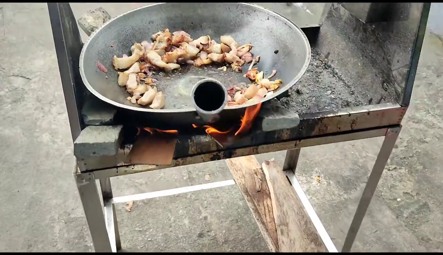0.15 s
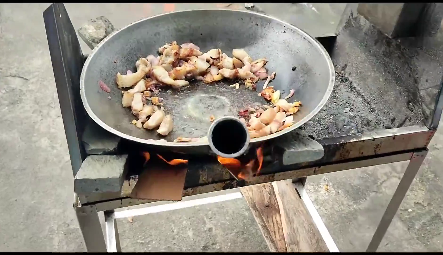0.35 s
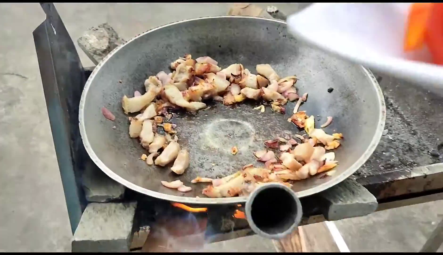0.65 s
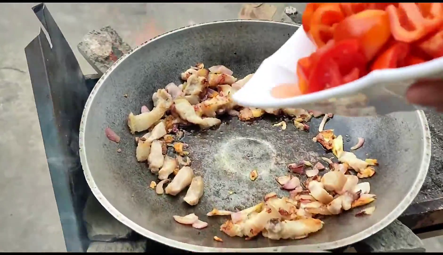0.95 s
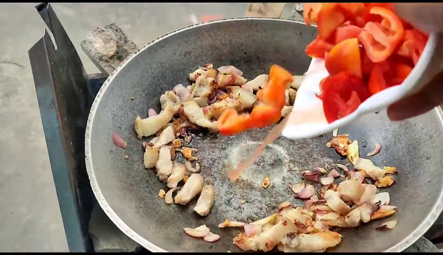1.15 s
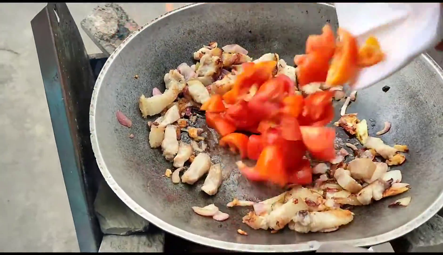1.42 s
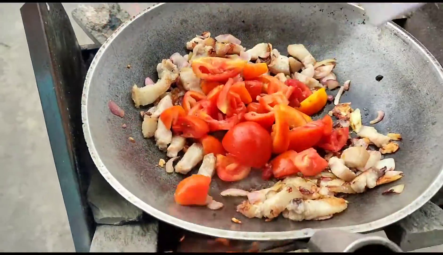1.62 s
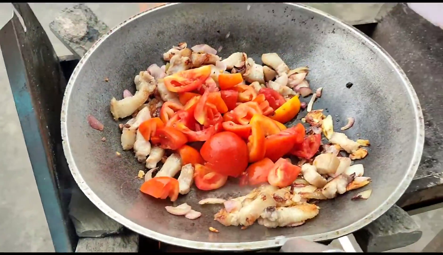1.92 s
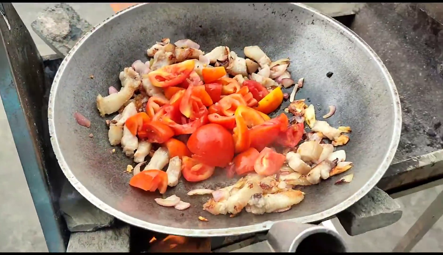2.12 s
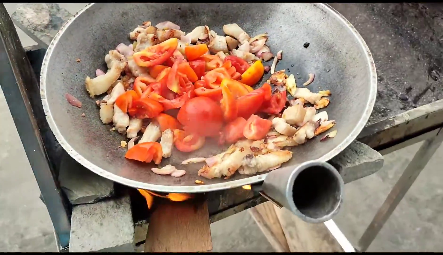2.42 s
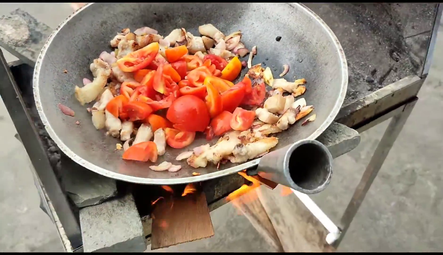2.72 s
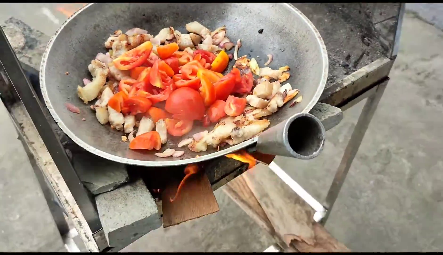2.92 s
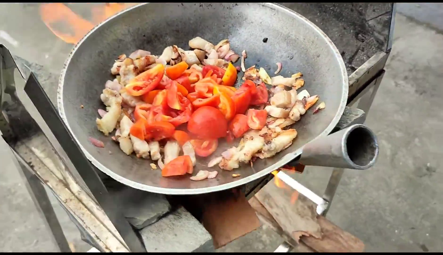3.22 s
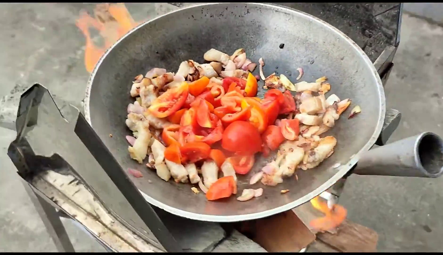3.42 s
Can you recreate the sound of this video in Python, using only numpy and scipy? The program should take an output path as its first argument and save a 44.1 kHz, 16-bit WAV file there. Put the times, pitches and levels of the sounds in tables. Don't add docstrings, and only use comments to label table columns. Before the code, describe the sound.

Meat sizzling in a metal wok, crackling and spitting, surging louder when wet tomatoes drop in

```python
import sys
import numpy as np
from scipy import signal
from scipy.fft import rfft, irfft, next_fast_len
from scipy.io import wavfile
from scipy.ndimage import uniform_filter1d, map_coordinates

SR = 44100
rng = np.random.default_rng(int(sys.argv[2]) if len(sys.argv) > 2 else 0)


def master(y):
    cut = np.clip(np.atleast_2d(y).T, -1, 1)
    pcm = np.round(cut * 32767)
    wavfile.write(sys.argv[1], SR, pcm.astype(np.int16))


def ratio_of_db(decibels):
    return 10 ** (np.asarray(decibels, float) / 20)


N = 156555

# time in seconds, level in dB.
BOIL_DB = [(0, -33), (.25, -29.5), (.47, -28), (.7, -30), (1.0, -31), (1.285, -32), (1.3, -23.5),
           (1.345, -16.5), (1.4, -16), (1.485, -14), (1.51, -12.5), (1.9, -12.5), (2.15, -11.5),
           (2.3, -12.5), (2.55, -13.5), (2.8, -16), (3.15, -13), (3.55, -16)]
# frequency in Hz, density in dB per Hz.
HISS_DB = [(500, -28.5), (609, -14.5), (784, -21.5), (1110, -16), (4880, -4.5), (7200, -2), (8400, -9.5),
           (14400, -12.5)]
# frequency in Hz, left-right difference in dB.
LEAN_DB = [(100, 1), (1400, 1), (3100, 0), (6800, -8.5), (7700, -15.5), (8500, 10.5), (9900, -4),
           (14000, 1)]
# frequency in Hz, correlation from 0 to 1.
HISS_ALIKE = [(100, 1), (1000, 0.95), (2500, 0.93), (5000, 0.011), (14000, 0.014)]
# centre in seconds, left gain in dB, right gain in dB.
LULLS_DB = [(1.545, -1, -3), (1.635, -4, -1.8), (1.686, -4.5, -4.5), (1.74, -0.2, -3.5), (1.785, -1, -7.5),
            (1.896, -5.5, -2.5), (2.0, 0.5, -2.5), (2.05, 0.5, 0.5), (2.09, 1.7, 0), (2.135, 0.5, 1),
            (2.2, -2, -2), (2.24, -3, -7), (2.325, -1.8, 0.5), (2.36, -1.5, -1), (2.409, -4, -2),
            (2.515, -6, -2), (2.721, -5, -2.2), (2.82, -1, 1.5), (2.885, -4, -2.5), (2.95, 0, -2),
            (3.01, 1, -0.5), (3.08, 0.5, -2), (3.28, -4.5, -2.5), (3.38, -2, 1), (3.46, -2, -2)]
# time in seconds, extra left level in dB.
TURN_DB = [(0, -13.5), (.8, -2.5), (1.2, -4.5), (1.5, 1), (1.8, 0.5), (1.9, -1), (2.2, -2.8), (2.55, -1.9),
           (2.75, -1.5), (3.1, -4.1), (3.25, -0.9), (3.55, -1.2)]
# frequency in Hz, density in dB.
FIRE_DB = [(25, -4), (70, 3.5), (120, -1), (155, -0.5), (210, -10.5), (330, -9.5), (450, -15.5),
           (2500, -21.5)]
# frequency in Hz, correlation from 0 to 1.
FIRE_ALIKE = [(25, 0.72), (150, 0.98), (600, 0.54), (3000, 0.096)]
# time in seconds, level in dB.
DRAUGHT_DB = [(0, -30.5), (.44, -28.5), (.46, -27), (.5, -33), (1.3, -31.5), (1.39, -30), (1.6, -37),
              (2.4, -35.5), (3.0, -34.5), (3.2, -28), (3.55, -31.5)]
# centre in Hz, width in Hz, level in dB.
FLUE_MODES = [(150.6, 37, 1), (325.5, 64, -8.5)]
# time in seconds, level in dB.
HUM_DB = [(0, -47.5), (2.5, -50), (2.8, -45), (3.05, -43), (3.2, -31), (3.3, -38), (3.4, -35), (3.55, -33)]
# start in seconds, peak in dB, pan in dB (the left port is louder by 0.6 x (pan + 11)
# dB), thud in dB.
FAT_SPITS = [(0.031, -9, -35, -5), (0.0418, -8.5, -26, -3), (0.081, -19, -19, -6), (0.085, -15, -14.5, 5),
             (0.1487, -17, -39, -20), (0.159, -19, -19, 0), (.2, -23, -15, -12), (.2125, -20, -15, -12),
             (0.24, -14.5, -19, -12), (.2922, -10.5, -12, -10), (.328, -23, -15, -16),
             (0.3506, -8.5, -14, -9), (0.308, -11.5, -20, -17), (0.4186, -13, -22, -3),
             (0.4289, -8.5, -21, -4), (0.436, -12, -25, -17), (0.488, 2.5, -3, 4), (0.5146, -6.5, -22, 5),
             (0.5535, -2, -5, -10), (0.6145, -57, -8, -16), (0.6892, -26, -6, -18), (0.751, -7.5, -32, 6),
             (0.767, -9, -22, -13), (0.761, -17, -20, -17), (0.7818, -10.5, -36, -18),
             (.8512, -14, -21, -12), (0.8620, 0, -14, 2), (0.864, -0.5, -13, -5), (0.8931, -8, -14, -10),
             (0.9015, -6, -19, -10), (.9209, -23, -18, -14), (.9687, -26, -8, -14), (.976, -27, -18, -12),
             (0.9958, 0, 4, -.6), (1.0938, -18, 2, -17), (1.1325, -23, -8, -12), (1.154, -10, 4, -20),
             (1.1764, -1, -7, 3.5), (1.1952, -9, -3.5, -20), (1.1972, -9, -16, -18), (1.2415, -12, -4, -5),
             (1.385, 3, -17, -20), (1.3974, 8, 3, -10), (1.4722, 4, 3, 4), (1.4994, -1, -1, -22),
             (2.5814, -1.5, 9, 21), (2.643, -3, -12, -10), (2.6693, 7, -8, 0), (2.6745, -3, -22, -12),
             (2.7014, -5, -18, -12), (2.8704, -6, -22, -14), (3.483, 4, -17, 2)]
# start in seconds, length in seconds, level in dB.
SPATTER_BURSTS = [(.0325, .004, -12), (.149, .003, -26), (.6147, .0015, -15), (.6245, .004, -19),
                  (.6285, .005, -13), (.6895, .003, -10), (1.2945, .006, -15), (1.3255, .006, -6),
                  (.086, .012, -29), (.75, .03, -30), (.85, .009, -28), (1.31, .008, -18)]
# frequency in Hz, level in dB.
SPIT_DB = [(200, -40), (1000, -24), (3000, -12.5), (5500, -5.5), (7400, -4), (9000, -10), (13000, -11.5),
           (15500, -5)]
# frequency in Hz, level in dB.
THUD_DB = [(100, -1), (700, -4.5), (2000, -5), (4000, -7), (15000, -15)]
# frequency in Hz, level in dB.
SPRAY_DB = [(1000, -56), (4000, -15.5), (6000, -15), (7400, 0.5), (8600, -10.5), (13000, -16), (15500, -11)]
# start in seconds, level in dB, extra for the low modes in dB.
TRAY_KNOCKS = [
    (.088, -31.5, -3),
    (.3415, -18, -1.5),
    (.35, -24, -8),
    (.367, -29, 2.5),
    (.401, -27.5, 4.5),
    (.412, -34, 5),
    (.525, -29.5, 5),
]
# frequency in Hz, level in dB, 60 dB decay in seconds.
TRAY_MODES = [(722, 2.5, 0.092), (784, 4, 0.043), (944, 7, 0.033), (1106, 8.5, 0.045), (1330, 4, 0.03),
              (1540, -1, 0.034)]
# start in seconds, level in dB, extra for the low modes in dB.
TOMATO_BLOWS = [
    (1.3035, -18, -3),
    (1.312, -30, -6),
    (1.321, -23, 4),
    (1.331, -24, 3),
    (1.365, -33, -2),
    (1.4725, -22, 3),
    (1.479, -28, -3),
    (1.5, -33, 12.5),
]
# frequency in Hz, level in dB, 60 dB decay in seconds.
WOK_MODES = [(317, 1.5, 0.034), (486, -1.7, 0.054), (576, -2.5, 0.046), (630, 4, 0.017), (885, -13, 0.03),
             (1261, 2, 0.11), (1628, -0.5, 0.073), (1990, -8, 0.051), (3300, -7, 0.064)]
# time in seconds, offset re full scale.
DROPLET_PRESSURE = [
    (2.5818, 0),
    (2.5826, -.33),
    (2.64, 0),
    (2.665, .11),
    (2.677, .19),
    (2.75, .41),
    (2.88, .09),
    (3.0, .0),
    (3.2, -.04),
]
# start in seconds, rise in seconds, end in seconds, offset
BRIEF_SHIFTS = [
    (2.666, .004, 2.6755, .2),
    (2.687, .007, 2.702, .13),
]
# start in seconds, depth in dB.
DUCKS_DB = [
    (0.492, 11.5),
    (0.865, 9.5),
    (.998, 9.5),
    (1.181, 3.5),
    (1.399, 13.5),
    (2.57, 4),
    (2.584, 12.5),
    (2.678, 2.5),
]

CRACKLE_PER_S, CRACKLE_DB, CRACKLE_SPREAD_DB = 1200, 3, 4.5
CRACKLE_FADE_DB_PER_DB = 0.34
PORT_DELAY_S = .0003
BODY_HZ, BODY_GROWTH_DB_PER_DB = 4500, .3
LULL_S = 0.017
RATTLE_S, RATTLE_DB = 0.002, -9
LOW_MODES_HZ = 830
RECOVER_DB_PER_S, HOLD_S_PER_DB, DUCK_SMOOTH_S = 112, 0.0016, .003
CEILING = 0.92
TOP_HZ = 14330


def unit(x):
    return x / np.sqrt(np.mean(x ** 2) + 1e-20)


def along(points, hz):
    f, v = np.transpose(points)
    return np.interp(np.log(hz + 1), np.log(f + 1), v)


def curve(rows):
    return np.interp(np.arange(N) / SR, *np.transpose(rows), right=rows[-1][1])


def wobble(rate_hz):
    knots = rng.standard_normal(int(N * rate_hz / SR) + 4)
    return map_coordinates(knots, [np.arange(N) * rate_hz / SR])


def filtered(x, response):
    m = next_fast_len(N + 8192)
    return irfft(rfft(x, m) * response(np.fft.rfftfreq(m, 1 / SR)), m)[..., :N]


def ports(spectrum, hz):
    return ratio_of_db(along(spectrum, hz) + np.outer([.5, -.5], along(LEAN_DB, hz)))


def causal(x, spectrum):
    cepstrum = irfft(np.log(ports(spectrum, np.fft.rfftfreq(1024, 1 / SR))), 1024)
    cepstrum = cepstrum * np.r_[1, np.full(511, 2), 1, np.zeros(511)]
    pulse = irfft(np.exp(rfft(cepstrum)), 1024)[:, :512]
    return signal.fftconvolve(x, pulse / np.abs(pulse).max(), axes=1)[:, :N]


def rush(alike, patchy_db):
    z = signal.stft(rng.standard_normal((2, N)), nperseg=256)[2]
    field = uniform_filter1d(rng.standard_normal(z.shape[1:]), 8, 0)
    field = uniform_filter1d(field, 6, 1)
    pair = signal.istft(z * ratio_of_db(patchy_db * unit(field)), nperseg=256)[1][:, :N]

    def mid_side_gains(hz):
        angle = np.arccos(np.clip(along(alike, hz), -1, 1)) / 2
        return np.array([np.cos(angle), np.sin(angle)])

    mid, side = filtered(pair, mid_side_gains)
    return np.array([mid + side, mid - side])


def bubbles():
    place, rarity, sign, bearing, lean = rng.random((int(CRACKLE_PER_S * N / SR), 5)).T
    size = ratio_of_db(-CRACKLE_SPREAD_DB * np.log(rarity + .015)) * np.sign(sign - .5)
    pops = []
    for side in (1, -1):
        delay = side * (bearing - .5) * 4 * PORT_DELAY_S * SR
        at = np.clip((place * N + delay).astype(int), 0, N - 1)
        pops.append(np.bincount(at, size * ratio_of_db(side * 7.8 * (lean + 0.5)), N))
    return unit(causal(np.array(pops), HISS_DB))


def sizzle():
    boil_db = curve(BOIL_DB)
    hiss = unit(filtered(rush(HISS_ALIKE, patchy_db=1.1), lambda hz: ports(HISS_DB, hz)))
    crackle_db = CRACKLE_DB - CRACKLE_FADE_DB_PER_DB * (boil_db - boil_db.min())
    both = hiss + bubbles() * ratio_of_db(crackle_db)
    body = filtered(both, lambda hz: 1 / (1 + (hz / BODY_HZ) ** 4))
    both = both + body * (ratio_of_db(BODY_GROWTH_DB_PER_DB * (boil_db - boil_db.max())) - 1)
    t = np.arange(N) / SR
    lull_db = sum(np.outer(db, np.exp(-((t - s) / LULL_S) ** 2)) for s, *db in LULLS_DB)
    turn_db = np.outer([1, 0], curve(TURN_DB))
    flutter_db = np.array([1.23 * wobble(40) + 0.49 * wobble(150) for port in (0, 1)])
    shared_db = 0.51 * wobble(39.92)
    return ratio_of_db(boil_db + lull_db + turn_db + flutter_db + shared_db) * both


def flue(hz):
    return sum(ratio_of_db(db) / (1 + (2 * (hz - centre) / width) ** 4) for centre, width, db in FLUE_MODES)


def fire():
    noise = rush(FIRE_ALIKE, patchy_db=2.36)
    roar = unit(filtered(noise, lambda hz: ratio_of_db(along(FIRE_DB, hz)) * (hz > 12)))
    hum = unit(filtered(rng.standard_normal(N), flue))
    return ratio_of_db(curve(DRAUGHT_DB) + 0.88 * wobble(7.9)) * roar + ratio_of_db(curve(HUM_DB)) * hum


def spits():
    pops, thuds = np.zeros((2, 2, N + SR))
    t = np.arange(SR // 50) / SR
    for s, db, pan_db, thud_db in FAT_SPITS:
        start = round(s * SR) + 30
        rattle = ratio_of_db(RATTLE_DB - 60 * t / (3 * RATTLE_S)) * rng.standard_normal((2, len(t)))
        pop = rattle + 1.0 * (t == 0)
        port_db = np.array([[.3], [-.3]]) * (pan_db + 11)
        pops[:, start:][:, :len(t)] += pop * ratio_of_db(db + 3.5 + port_db)
        thuds[:, start] = ratio_of_db(db + thud_db)
    return causal(pops[:, :N], SPIT_DB) + causal(thuds[:, :N], THUD_DB)


def spatter():
    spray = np.zeros((2, N + SR))
    for s, length_s, db in SPATTER_BURSTS:
        u = np.arange(SR // 10) / SR / length_s
        lumps = rng.standard_normal((2, len(u))) * ratio_of_db(3 * wobble(900)[:len(u)])
        envelope = np.minimum(12 * u, 1) * np.exp(-u ** 2)
        spray[:, round(s * SR):][:, :len(u)] += ratio_of_db(db - 5) * lumps * envelope
    return causal(spray[:, :N], SPRAY_DB)


def struck(hits, modes, left_lag):
    x = np.zeros(N + SR)
    t = np.arange(SR // 4) / SR
    for s, db, low_db in hits:
        ring = 0
        for hz, level_db, t60_s in modes:
            mode_db = level_db + low_db * (hz < LOW_MODES_HZ) + rng.uniform(-4, 1)
            ring = ring + ratio_of_db(mode_db - 60 * t / t60_s) * np.sin(2 * np.pi * (hz * t + rng.random()))
        x[round(s * SR):][:len(t)] += ratio_of_db(db) * ring * (1 - np.exp(-t / 0.00048))
    return np.array([np.roll(x, left_lag), x])[:, :N]


def tray():
    return struck(TRAY_KNOCKS, TRAY_MODES, left_lag=16) * ratio_of_db([[1.5], [-1.5]])


def tomatoes():
    return struck(TOMATO_BLOWS, WOK_MODES, left_lag=-3)


def droplet():
    t = np.arange(N) / SR
    shifts = 0
    for s, rise_s, release_s, size in BRIEF_SHIFTS:
        shifts = shifts + size * np.clip((t - s) / rise_s, 0, 1) * (t < release_s)
    return curve(DROPLET_PRESSURE) + uniform_filter1d(shifts, size=30)


def scene():
    return sizzle() + fire() + spits() + spatter() + tray() + tomatoes()


def gain_control():
    t = np.arange(N) / SR
    ducks = []
    for s, db in DUCKS_DB:
        recovering_s = np.maximum(t - s - HOLD_S_PER_DB * db, 0)
        ducks.append((t > s) * np.clip(db - RECOVER_DB_PER_S * recovering_s, 0, None))
    duck_db = np.max(ducks, axis=0)
    return ratio_of_db(-uniform_filter1d(duck_db, max(1, int(DUCK_SMOOTH_S * SR))))


def top_cut(x):
    return signal.sosfilt(signal.butter(12, 15550, fs=SR, output="sos"), x)


def record(dry):
    x = dry * gain_control()
    x = x + np.outer([0, 1], droplet())
    x = x / (1 + np.abs(x / CEILING) ** 8) ** (1 / 8)
    low = filtered(x, lambda hz: hz < TOP_HZ)
    t = np.arange(N) / SR
    sharp = sum(np.exp(-((t - s - .0007) / .0006) ** 2) for s, db, *_ in FAT_SPITS if db > -2.2)
    mix = low + ratio_of_db(-15) * sharp * (x - low)
    return top_cut(mix)


dry = scene()
out = record(dry)
master(out)
```